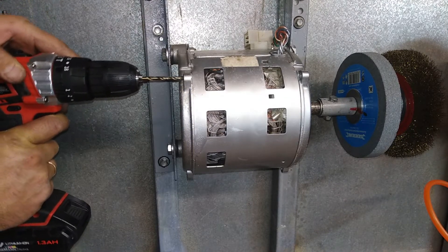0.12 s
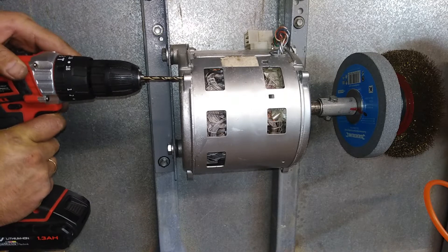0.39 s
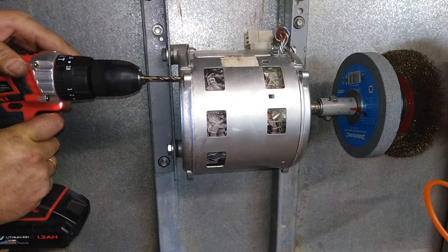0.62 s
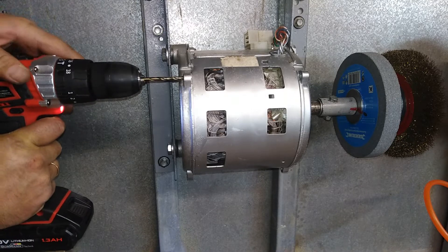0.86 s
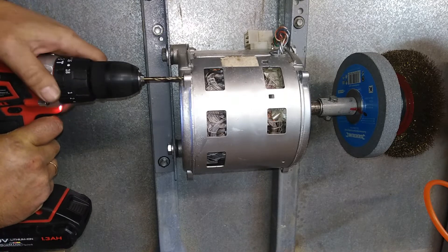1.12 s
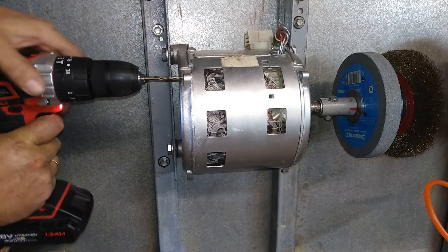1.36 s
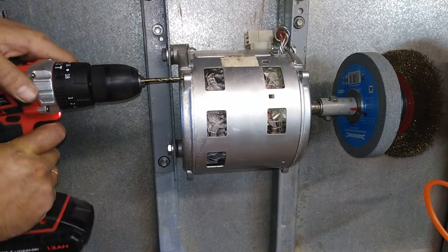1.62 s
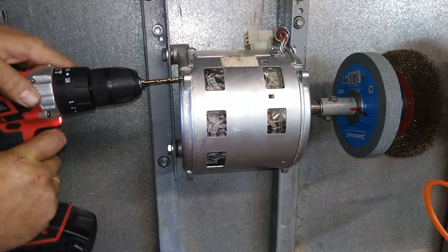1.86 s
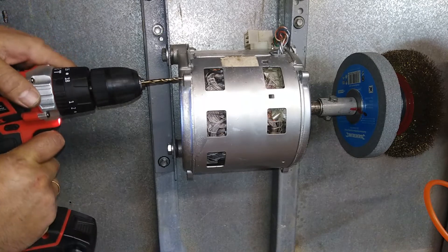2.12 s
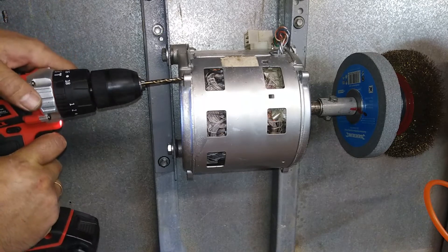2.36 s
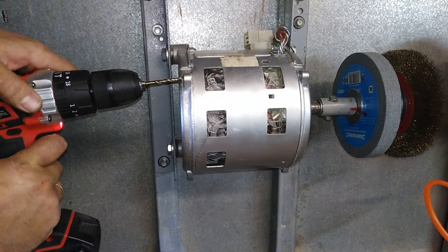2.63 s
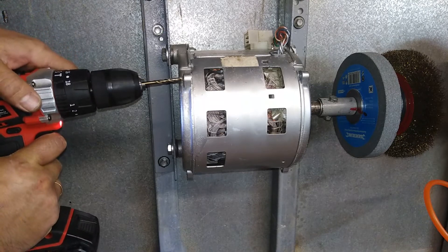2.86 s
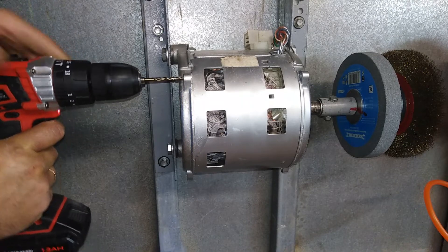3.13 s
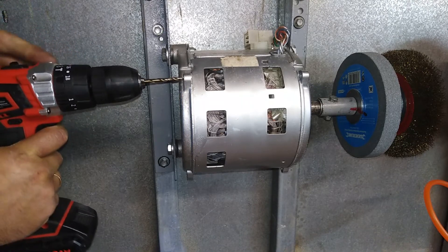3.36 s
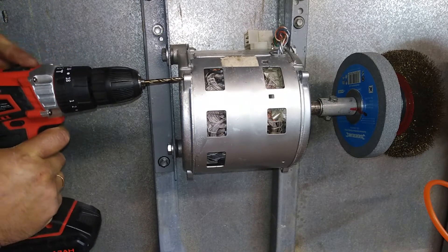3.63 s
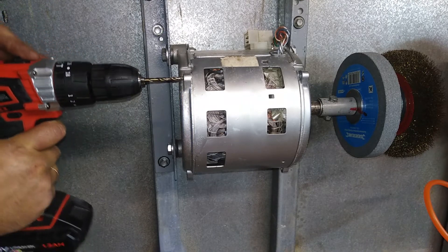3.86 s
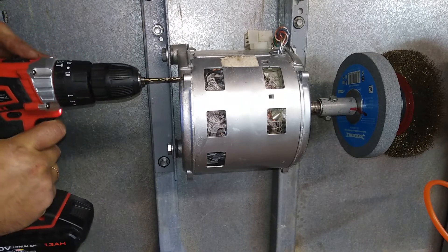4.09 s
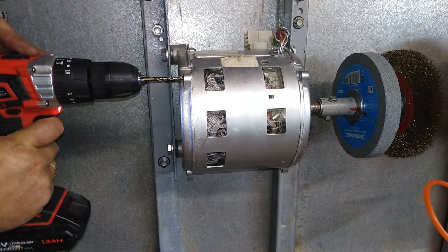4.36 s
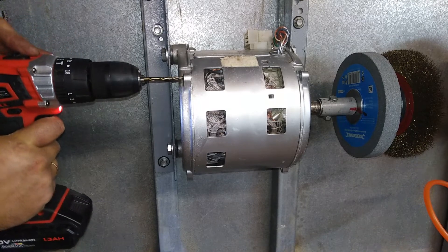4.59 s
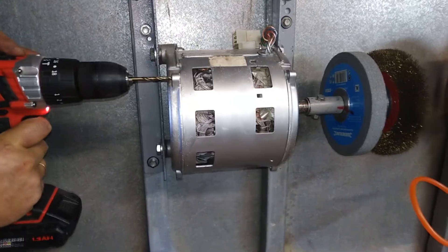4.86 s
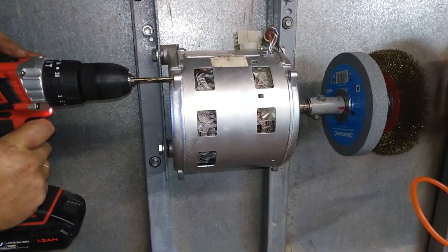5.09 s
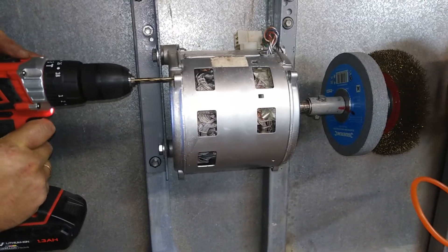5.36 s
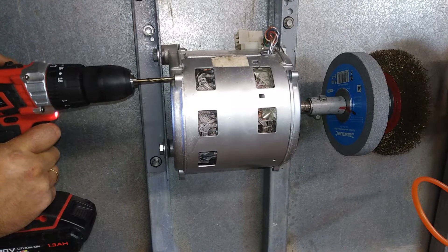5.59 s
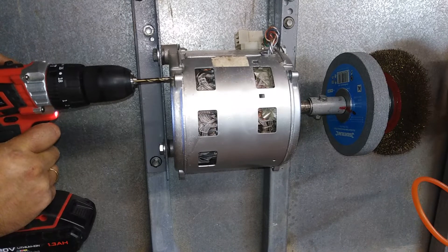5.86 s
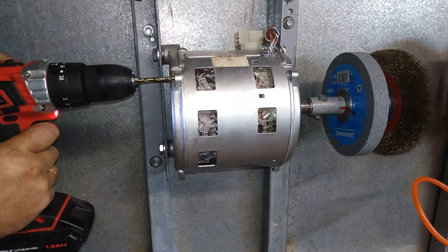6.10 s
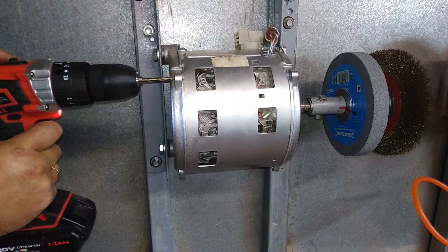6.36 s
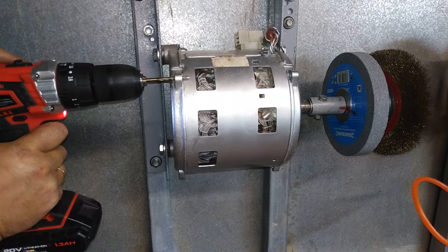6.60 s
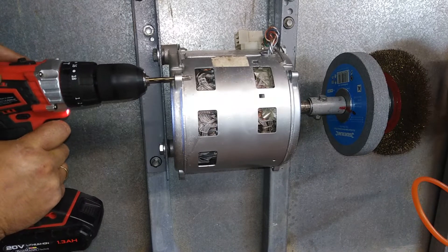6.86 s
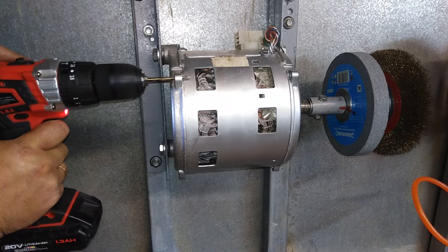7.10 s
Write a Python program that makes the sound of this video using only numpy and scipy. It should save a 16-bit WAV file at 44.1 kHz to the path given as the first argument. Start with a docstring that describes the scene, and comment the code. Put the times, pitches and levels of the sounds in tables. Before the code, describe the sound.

Close stereo sound of a cordless drill on a metal bench. Dull scuffs, soft knocks and low thumps, then a thin electronic whine and the motor climbs, sags, rises weakly and winds down. A trigger tick and near-silent half-second pause follow. It restarts, races to a hissing high whir, cuts abruptly to a slower run, and climbs again to full speed at the end.

```python
"""Scuffs, soft knocks and a low rumble come first, then a cordless drill bores into cast metal on a steel bench.
The drill runs in four stretches, with a pause after the second; a hard cut at 5.49 s jumps from full speed
to a slower run already under way. Motor and gears are sine tones tied to the shaft angle; hiss, rasp and fan air
are filtered noise. The controller whine is gliding sine tones, the rumble is noise through three low resonances,
and ticks, knocks and thumps are short bursts. All of it reaches a close two-port microphone."""
import sys
import numpy as np
from scipy import signal
from scipy.fft import rfft, irfft, next_fast_len
from scipy.io import wavfile
from scipy.ndimage import uniform_filter1d

SR = 44100
rng = np.random.default_rng(int(sys.argv[2]) if len(sys.argv) > 2 else 0)


def int16_out(signal):
    """Quantize to a 16-bit WAV file."""
    q = np.round(np.clip(np.atleast_2d(signal).T, -1, 1) * 32767)
    wavfile.write(sys.argv[1], SR, q.astype(np.int16))


def volts_from_decibels(level):
    """Turn decibel levels (scalar or array-like) into linear amplitude factors."""
    exponent = np.asarray(level, float) / 20
    return 10 ** exponent


N = 318402  # length in samples
TIME = np.arange(N) / SR  # seconds


def level(x, db):
    """Scale a sound to a given rms level in dB."""
    return x * volts_from_decibels(db) / np.sqrt(np.mean(x ** 2))


def table_db(points, hz):
    """Read a (frequency [Hz], level [dB]) table, with straight lines on a log-frequency axis."""
    f, db = np.transpose(points)
    return np.interp(np.log(hz + 1), np.log(f), db)


def shape(x, response):
    """Filter a sound by a response given as a function of frequency in Hz."""
    size = next_fast_len(x.shape[-1] + SR // 8)
    hz = np.arange(size // 2 + 1) * SR / size
    return irfft(rfft(x, size) * response(hz), size)[..., :x.shape[-1]]


def coloured(points):
    """Turn a table of levels over frequency into a filter response."""
    return lambda hz: volts_from_decibels(table_db(points, hz))


def band(lo_hz, hi_hz, order=3):
    """Response that passes one band and falls off on both sides, more steeply at a higher order."""
    def response(hz):
        below = 1 + (lo_hz / (hz + 1)) ** (2 * order)
        above = 1 + (hz / hi_hz) ** (2 * order)
        return 1 / np.sqrt(below * above)
    return response


def walk(rate, size):
    """Smooth random wandering about 0: random values held for 1 / rate seconds, then smoothed twice."""
    k = int(SR / rate)
    steps = np.repeat(rng.standard_normal(size // k + 1), k)
    return 1.5 * uniform_filter1d(uniform_filter1d(steps, k), k)[:size]


def played(rows):
    """Find the samples that a timed table covers and draw its columns out to one value per sample."""
    s, *columns = np.transpose(rows)
    span = slice(int(s[0] * SR), min(int(s[-1] * SR), N))
    return span, [np.interp(TIME[span], s, c) for c in columns]


def fading(t, t60):
    """Ringing dies away exponentially, by 60 dB in t60 seconds."""
    return np.exp(-np.log(1000) * t / t60)


# Loudness difference between the ports: (frequency [Hz], left minus right [dB])
BALANCE = [(60, 0), (110, -1), (200, 0.5), (380, 1.5), (700, 3), (1290, -1.5), (2370, -4.5), (4380, 0),
           (8080, -4), (14900, -15.5)]
# Scattered sound compared with direct sound: (frequency [Hz], level [dB])
REFLECTED = [(60, -13.5), (300, -4), (1000, -5), (3000, 2), (6000, 8.5), (12000, 13.5)]


def ports(x):
    """Direct sound (row 0) reaches the right port later; each port adds its own scattered sound (rows 1, 2)."""
    lag_s = 0.00012
    side = np.array([[1], [-1]])  # left, right
    scattered = shape(x[1:], coloured(REFLECTED))
    # half the lag forward on the left, half back on the right
    direct = shape(x[:1], lambda hz: np.exp(1j * np.pi * side * hz * lag_s))

    def balance(hz):
        both_paths = np.sqrt(1 + volts_from_decibels(table_db(REFLECTED, hz)) ** 2)  # evens out the added power
        return volts_from_decibels(side * table_db(BALANCE, hz) / 2) / both_paths
    return shape(direct + scattered, balance)


# While the motor rests, one table per stretch: (time [s], scuffing on the bench [dB], faint hiss [dB])
REST = [
    [(0.0, -46, -40), (0.3, -38, -47), (0.36, -47, -53), (0.44, -42, -70), (0.49, -41, -77),
     (0.56, -37, -46)],
    [(3.66, -43, -45), (3.712, -58, -62), (3.79, -65, -71), (4.142, -99, -74), (4.19, -76, -59),
     (4.22, -36, -59)],
]
# Colour of the scuffing, one table per stretch: (frequency [Hz], level [dB per Hz])
SCUFF = [
    [(100, -39.5), (170, -10), (328, 0), (418, -13.5), (514, -1), (609, -18.5), (748, -9.5), (878, -25),
     (1070, -24), (1600, -40), (2080, -92), (3520, -120)],
    [(100, -42), (170, -21), (347, -15), (399, -2), (491, -15), (694, -17), (982, -2), (1090, 10),
     (1210, -17), (1600, -28), (2080, -62), (3520, -120)],
]
# Colour of the faint hiss: (frequency [Hz], level [dB per Hz])
FAINT = [(940, -73), (1600, -51), (1990, -9), (2640, -23), (2850, -1.5), (4500, -4), (4700, -15),
         (5180, 0.5), (7620, 1), (13000, -18.5)]


def rest():
    """Dull scuffing and a faint hiss while the motor rests: coloured noise with a wandering level."""
    out = np.zeros((3, N))
    for rows, colour in zip(REST, SCUFF):
        span, (scuff_db, faint_db) = played(rows)
        size = len(scuff_db)
        for points, db in ((colour, scuff_db), (FAINT, faint_db)):
            noise = level(shape(rng.standard_normal((3, size)), coloured(points)), 0)
            fade = signal.windows.tukey(size, .05)
            out[:, span] += noise * volts_from_decibels(db + 3.6 * walk(34.3, size)) * fade
    return out


# Loudness of the bench rumble: (time [s], level [dB])
RUMBLE = [(0.0, -36.5), (0.32, -38), (0.55, -39), (0.86, -42), (1.11, -36), (1.35, -43), (1.63, -34),
          (1.75, -40), (3.24, -38.5), (3.6, -47.5), (4.0, -76.5), (4.34, -55), (4.4, -40.5), (4.87, -33.5),
          (4.95, -44.5), (5.79, -32), (6.11, -38), (6.15, -28), (7.06, -29), (7.22, -26)]
# Resonances of the bench: (frequency [Hz], width [Hz], level [dB])
BENCH = [(70.3, 10, 3.5), (113.6, 13, 2), (197, 280, -8)]


def bench():
    """The sheet-steel bench booms: noise rings through three low resonances."""
    def modes(hz):
        ringing = sum(volts_from_decibels(db) / (1 + 2j * (hz - f) / width) for f, width, db in BENCH)
        return ringing * band(57, 260, order=8)(hz)
    s, db = np.transpose(RUMBLE)
    boom = level(shape(rng.standard_normal((3, N)), modes), 0)
    return boom * volts_from_decibels(np.interp(TIME, s, db))


# The hand shifts the drill: (time [s], peak level [dB], frequency [Hz], rise time [s])
THUMPS = [(0.255, -24.5, 65, 0.03), (0.393, -31.5, 97.4, 0.0074), (0.46, -26, 67, 0.033),
          (4.735, -21.5, 124, 0.0073)]


def thumps():
    """Low thumps in the bench: one sine each, which swells to its peak and dies away."""
    out = np.zeros(N)
    for s, db, hz, rise in THUMPS:
        t = np.maximum(TIME - s, 0)
        swell = (t / rise * np.exp(1 - t / rise)) ** 2
        out += volts_from_decibels(db) * np.sin(2 * np.pi * hz * t) * swell
    return out


# The drill is set against the housing: (time [s], level [dB], time to fade by 60 dB [s])
KNOCKS = [(0.23, -28.5, 0.13), (0.451, -35.5, 0.099)]
# Tones of the struck housing: (frequency [Hz], level [dB])
KNOCK_MODES = [(260, 5), (520, 1.5), (770, 3), (1060, -7)]


def knocks():
    """Soft knocks: the housing rings in a few tones, roughened by a scraping contact."""
    out, t = np.zeros(N), np.arange(SR // 10) / SR
    ring = sum(volts_from_decibels(db) * np.sin(2 * np.pi * hz * t) for hz, db in KNOCK_MODES) / 2
    soft_start = np.minimum(t / .004, 1)
    ring = ring * soft_start * (1 + walk(300, len(t)))
    for s, db, t60 in KNOCKS:
        start = int(s * SR)
        out[start:start + len(t)] += volts_from_decibels(db) * ring * fading(t, t60)
    return out


# Ticks of the trigger: (time [s], level [dB], frequency [Hz], time to fade by 60 dB [s])
TICKS = [(3.6373, -31.5, 4560, 0.057), (3.7335, -53.5, 4800, 0.027), (3.8094, -56, 5100, 0.035)]


def ticks():
    """Trigger ticks: a high tone mixed with noise, which dies away fast."""
    out, t = np.zeros(N), np.arange(SR // 10) / SR
    for s, db, hz, t60 in TICKS:
        crack = np.sin(2 * np.pi * hz * t) + 0.75 * rng.standard_normal(len(t))
        start = int(s * SR)
        out[start:start + len(t)] += volts_from_decibels(db) * crack * fading(t, t60)
    return out


# Speed controller, pitch of its second harmonic and level before the harmonics are weighed:
# (start time [s], end time [s], start pitch [Hz], end pitch [Hz], start level [dB], end level [dB])
WHINE = [(0.477, 0.559, 6660, 6480, -41, -32.5), (0.564, 0.753, 6280, 6200, -28.5, -34),
         (0.781, 1.104, 6400, 6460, -31, -29.5), (2.076, 2.134, 6200, 6170, -30, -45),
         (4.167, 4.38, 6580, 6540, -45.5, -37)]
# Weights of harmonics 1 to 4: (level [dB])
WHINE_HARMONICS = [-10.5, 5, -6, -20.5]


def whine():
    """The switching controller makes the windings sing at a nearly fixed pitch with four harmonics."""
    out = np.zeros(N)
    for s0, s1, hz0, hz1, db0, db1 in WHINE:
        span, (hz, db) = played([(s0, hz0, db0), (s1, hz1, db1)])
        phase = np.pi * np.cumsum(hz) / SR  # first harmonic, half the listed pitch
        tone = sum(volts_from_decibels(k_db) * np.sin(k * phase) for k, k_db in enumerate(WHINE_HARMONICS, 1))
        out[span] = tone * volts_from_decibels(db) * signal.windows.tukey(len(hz), .09)
    return out


def song(turn, octaves, table, per_turn, slip_rad, flicker_db):
    """Tones at multiples of the shaft angle (rad) that swell, flicker and slip a little in phase."""
    swell_db, drift_rad = 1.5, .7
    paths = np.array([[1.4], [.9], [.9]])  # direct, then scattered at each port: less scatter than the noise
    size, out = len(turn), 0
    for k, db, slope in table:
        loudness = db + slope * np.maximum(octaves, -.6)
        loudness = loudness + swell_db * walk(5, size) + flicker_db * walk(45, size)
        drift = drift_rad * np.array([walk(3, size) for _ in paths])
        phase = k * per_turn * turn + slip_rad * walk(110, size) + drift
        out = out + volts_from_decibels(loudness) * paths * np.sin(phase)
    return out


STALL_HZ = 62  # shaft speed around and below which the tones die away

# Motor tones, level at mid speed against the noise before the shell:
# (multiple of shaft speed, level [dB], change [dB per octave of speed])
MOTOR = [(1, -21, 0), (3, -15, -4), (4, -25, 0), (6, -17, -6), (9, -23, -5), (12, -9, 1), (15, -23, 5),
         (18, -29, 0), (21, -24, 1), (24, -17, 3), (27, -18, 0), (30, -21, 0), (33, -18, -1), (36, -20, 2),
         (38, -27, 2), (39, -22, 2), (40, -29, 1), (42, -24, 1), (44, -28, 1), (45, -24, 0), (46, -29, 1),
         (48, -25, 0)]
# How well the shell radiates the motor tones: (frequency [Hz], level [dB])
RADIATES = [(150, -1), (600, 0), (800, 0), (1050, -7), (1400, -5), (1800, 1), (2400, 2), (2800, 3),
            (3200, 0), (3600, -2), (4000, -1), (4500, 9), (5200, 6), (6000, 0), (7000, 8), (7800, 2),
            (9500, 1), (11500, 9)]


def motor_tones(turn, octaves, hz, db):
    """The motor sings at whole multiples of the shaft speed and fades out towards a stall."""
    poles = song(turn, octaves, MOTOR, 1, slip_rad=.3, flicker_db=2) * volts_from_decibels(db)
    return shape(poles / (1 + (STALL_HZ / hz) ** 4), coloured(RADIATES))


# Gear tones, level at mid speed against the noise before the shell:
# (multiple of the tooth rate, level [dB], change [dB per octave of speed])
GEAR = [(1, -14, 2), (2, -14, 0), (3, -14, -2), (4, -17, -1), (5, -20, 0)]
# How well the gear case radiates the tooth tones: (frequency [Hz], level [dB])
GEAR_RADIATES = [(700, -6), (1200, -3), (1600, -4), (2000, -4), (2500, -1), (3200, 0), (3800, -4),
                 (4800, 2), (5800, -4), (6900, 3), (8000, -3), (11500, 0)]


def gear_tones(turn, octaves, hz, db):
    """Gear teeth sing at multiples of the rate at which they meet, more roughly than the motor."""
    teeth_per_turn = 28 / 3
    teeth = song(turn, octaves, GEAR, teeth_per_turn, slip_rad=1.1, flicker_db=3) * volts_from_decibels(db)
    return shape(teeth / (1 + (STALL_HZ / hz) ** 4), coloured(GEAR_RADIATES))


def beaten_noise(turn):
    """Teeth and brushes catch harder once a turn and once a commutator bar, so the noise pulses."""
    beat = 1 + 0.065 * np.cos(turn) + 0.047 * np.cos(3 * turn)
    beat = beat * volts_from_decibels(0.88 * walk(700, len(turn)))
    return level(rng.standard_normal((3, len(turn))) * beat, 0)


# Broad colour of the plastic shell: (frequency [Hz], level [dB per Hz])
CASING = [(88, -43.5), (150, -11), (293, -7.5), (348, -8.5), (775, -7.5), (956, -12.5), (1160, -4.5),
          (2170, -4.5), (2790, -12), (3500, -4.5), (4080, -6), (6840, 3.5), (7670, -0.5), (10800, -6.5),
          (14400, -6)]
# Resonances of the shell: (frequency [Hz], width [Hz], level [dB])
SHELL = [(824, 120, 4.5), (1170, 19, 3), (2260, 100, 1.5), (3360, 120, -3.5), (4920, 880, 4.5),
         (6700, 270, -0.5)]


def casing(hz):
    """The plastic shell colours all that passes through: a broad curve and a few resonances."""
    lift = sum(db / (1 + (2 * (hz - f) / width) ** 2) for f, width, db in SHELL)
    return volts_from_decibels(table_db(CASING, hz) + lift)


def motor(hz, hiss_db, motor_db, gear_db):
    """Tones and pulsing noise pass the shell; three bands of them become cutting rasp, gear hiss and fan air."""
    mid_speed_hz, mid_hiss_db = 150, -20
    size, octaves = len(hz), np.log2(hz / mid_speed_hz)
    turn = 2 * np.pi * np.cumsum(hz * (1 + .0008 * walk(60, size))) / SR  # shaft angle, slightly unsteady
    tones = motor_tones(turn, octaves, hz, motor_db) + gear_tones(turn, octaves, hz, gear_db)
    sound = shape(beaten_noise(turn) + tones, casing)

    rasp_db = -6.5 - 0.18 * (hiss_db - mid_hiss_db)  # against the hiss; grows more slowly than it
    rasp = level(shape(sound, band(160, 3370, order=5)), 0)
    rasp = rasp * volts_from_decibels(rasp_db + walk(20.07, size))

    hiss = level(shape(sound, band(3110, 7020, order=5)), 0)
    hiss = hiss * volts_from_decibels(walk(12.0, size))

    air_db = -10.5 + 0.4 * octaves  # against the hiss; rises with speed
    air = level(shape(sound, band(9500, 10900, order=8)), 0)
    air = air * volts_from_decibels(air_db + 1.2 * walk(9.3, size))

    waver_db = 0.62 * walk(17.92, size)  # the level wavers under the hand
    return (rasp + hiss + air) * volts_from_decibels(hiss_db + waver_db)


# One table per stretch of running; the fourth begins at a hard cut, with the motor already turning:
# (time [s], shaft speed [Hz], gear hiss [dB], motor tones [dB], gear tones [dB])
RUNS = [
    [(0.5, 41.65, -54, -6, -13.5), (0.6, 56.56, -25, 4, -6.5), (0.765, 91.97, -26, 0, -2),
     (0.928, 137.3, -22, -2, -8), (1.132, 161.6, -19.5, 1, 0.5), (1.254, 194.6, -17.5, -3.5, -7),
     (1.377, 218.6, -17.5, 2.5, -6), (1.478, 228.4, -17.5, -3.5, -9.5), (1.54, 220.5, -19, 2, 2.5),
     (1.703, 172.1, -17.5, -5, -4.5), (1.907, 107.4, -20, -8.5, -2), (2.01, 78.6, -18, -3, 1),
     (2.09, 61.4, -24.5, 2.5, -3.5)],
    [(2.09, 55.8, -25.5, 4.5, 1.5), (2.18, 62.5, -20.5, -3, -0.5), (2.355, 86, -21, -5, 3),
     (2.416, 88.3, -19, -5, -4.5), (2.5, 86.5, -19.5, -6, 2.5), (2.599, 81.5, -18, -3, 0),
     (2.783, 106.8, -16.5, -9, -1.5), (2.966, 134.2, -18, -1, -13.5), (3.027, 129.5, -20.5, -9, -13.5),
     (3.292, 68, -29.5, -1, -6.5), (3.47, 45, -29, 1.5, 2), (3.62, 35, -43.5, 13, -1),
     (3.69, 21, -51.5, 0, -10.5), (3.72, 8.2, -84, -3.5, -10.5)],
    [(4.17, 22.33, -89, -3, -4), (4.22, 26.85, -43, -5, 4), (4.314, 41.97, -27.5, -4.5, -2),
     (4.602, 86, -19, -3, -2.5), (4.787, 130.3, -17.5, -0.5, -4.5), (4.931, 200.6, -15, -0.5, -5.5),
     (5.014, 237.7, -13.5, -1, -10), (5.117, 263.2, -11, -3.5, -9), (5.219, 286.5, -10, -1, -16),
     (5.302, 293.5, -10.5, -4, -16.5), (5.482, 297.6, -10, 0, -10), (5.487, 306, -10, 6.5, -10)],
    [(5.489, 109.9, -27.5, 0, 4.5), (5.591, 129.8, -21, -2.5, -5.5), (5.66, 136.5, -19.5, -3, 10.5),
     (5.713, 135.9, -18.5, -2, -3.5), (5.876, 148.8, -18.5, -0.5, 0), (5.978, 170.7, -15.5, -8.5, -1),
     (6.05, 174.3, -13, -8, 5.5), (6.181, 186.1, -10, -8, 0.5), (6.304, 233.9, -11.5, -2, -3.5),
     (6.426, 260.7, -12, -3, -0.5), (6.528, 273, -11, -6.5, -4.5), (6.629, 275.4, -11, -2, -0.5),
     (6.833, 294.8, -10.5, -1.5, -12), (7.016, 303, -11, -2, -6), (7.22, 305.3, -11.5, 2, -0.5)],
]


def drill():
    """Each stretch of running takes the motor through its own course of speed and levels."""
    out = np.zeros((2, N))
    for rows in RUNS:
        span, controls = played(rows)
        out[:, span] += ports(motor(*controls))
    return out


def scene():
    """Pauses, bench, handling sounds, controller and drill add up at the two ports."""
    taps = thumps() + knocks() + ticks()
    return ports(rest() + bench() + taps + whine()) + drill()


def low_pass(x):
    """Removes everything above the highest recorded frequency."""
    return signal.sosfilt(signal.butter(12, 15520, fs=SR, output="sos"), x)


def record(dry):
    """A steep filter cuts the top, and any peaks beyond full scale clip."""
    top_hz = 14400
    steep = signal.ellip(8, .3, 60, top_hz, fs=SR, output="sos")
    mix = np.clip(signal.sosfilt(steep, dry), -1, 1)
    return low_pass(mix)


dry = scene()
out = record(dry)
int16_out(out)
```